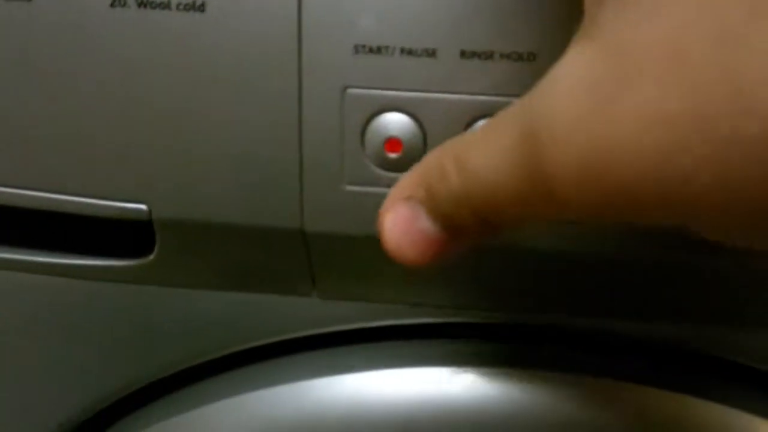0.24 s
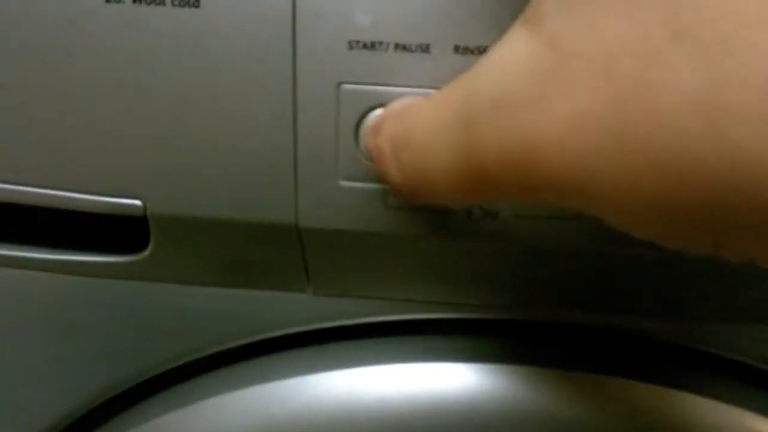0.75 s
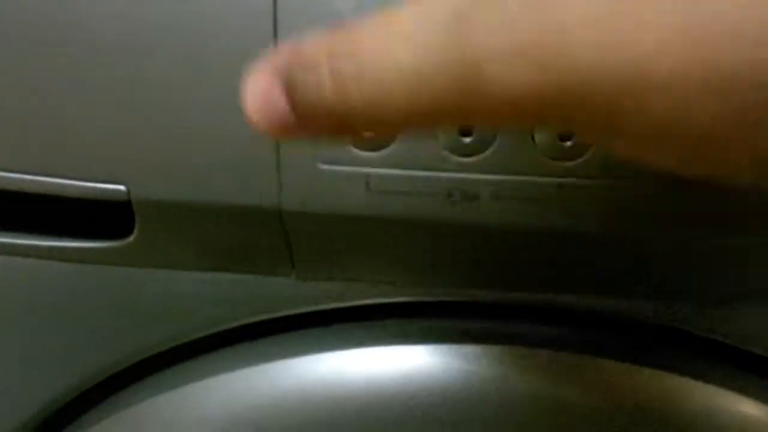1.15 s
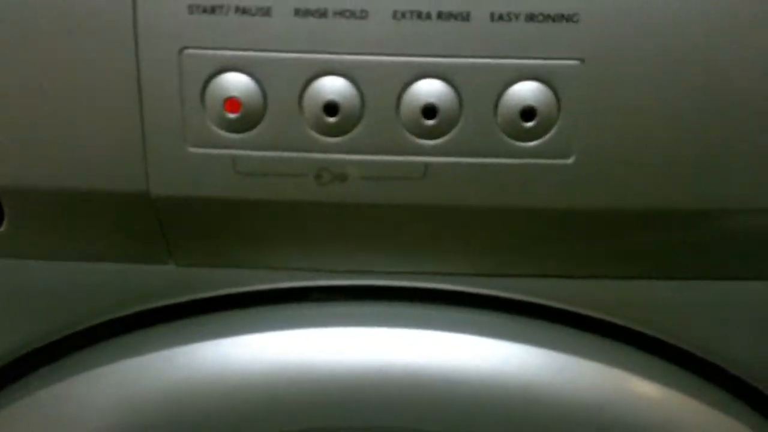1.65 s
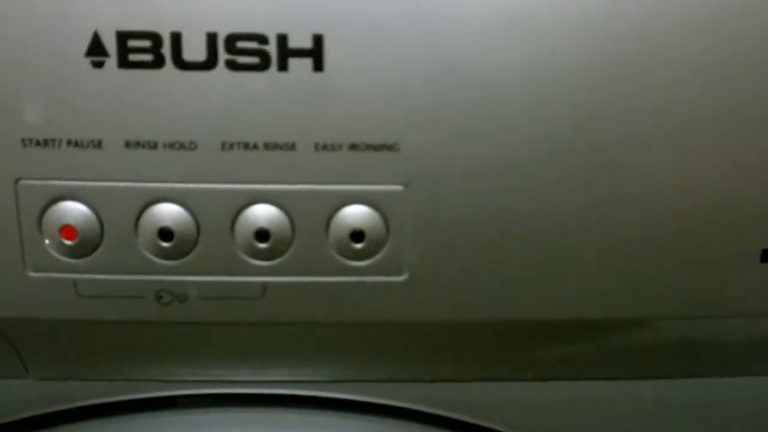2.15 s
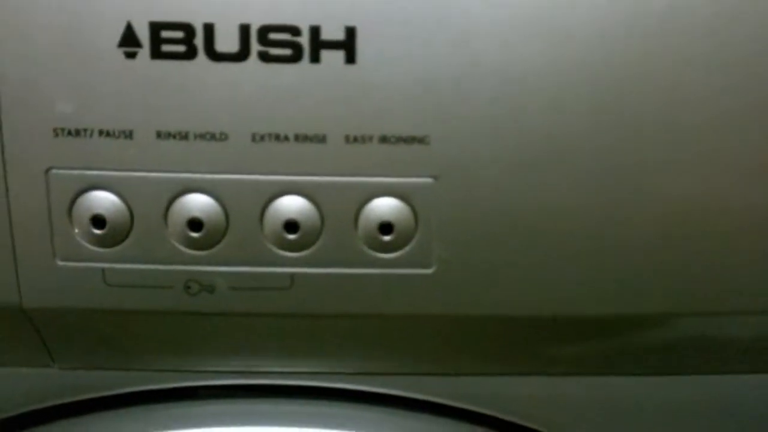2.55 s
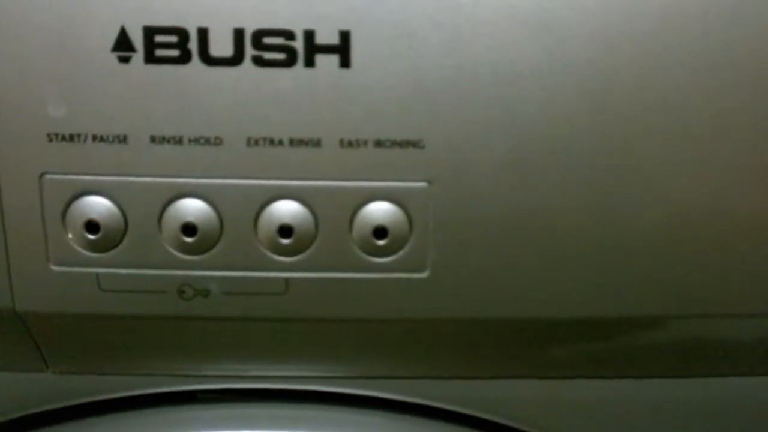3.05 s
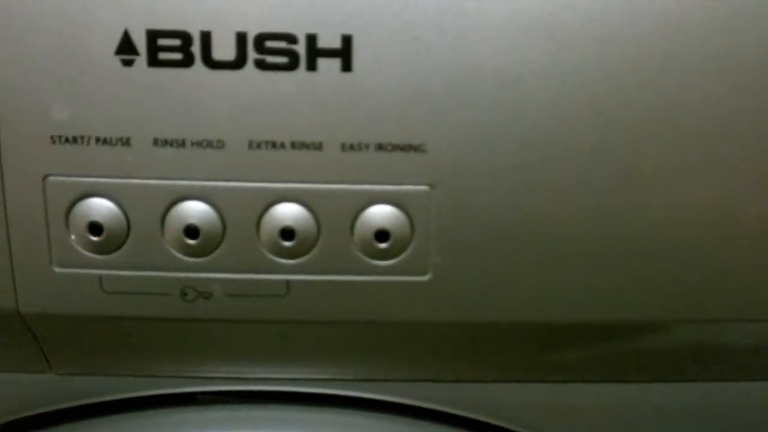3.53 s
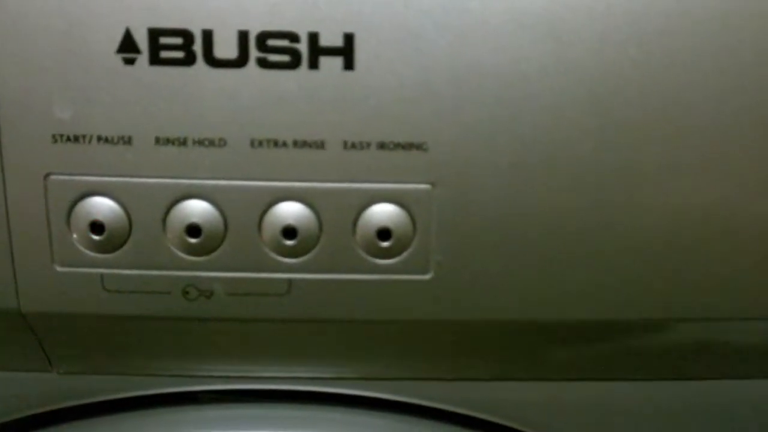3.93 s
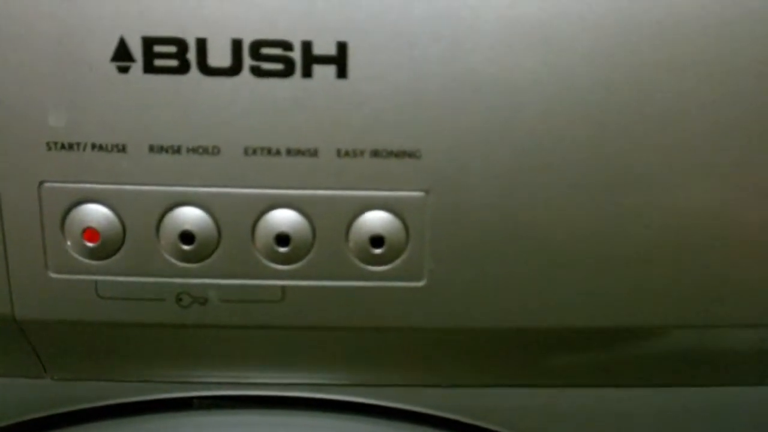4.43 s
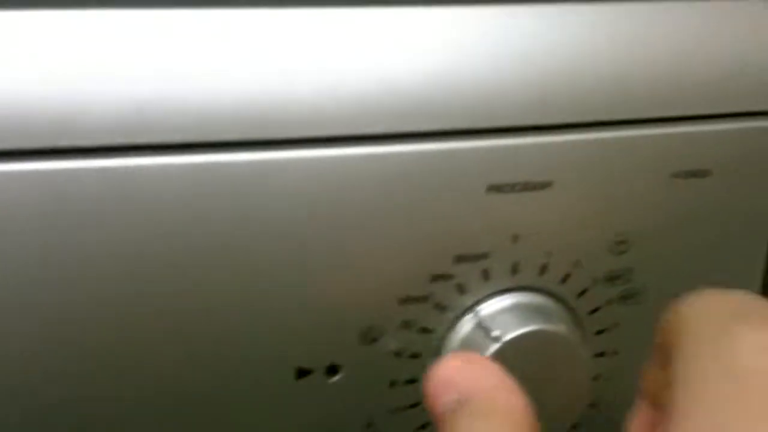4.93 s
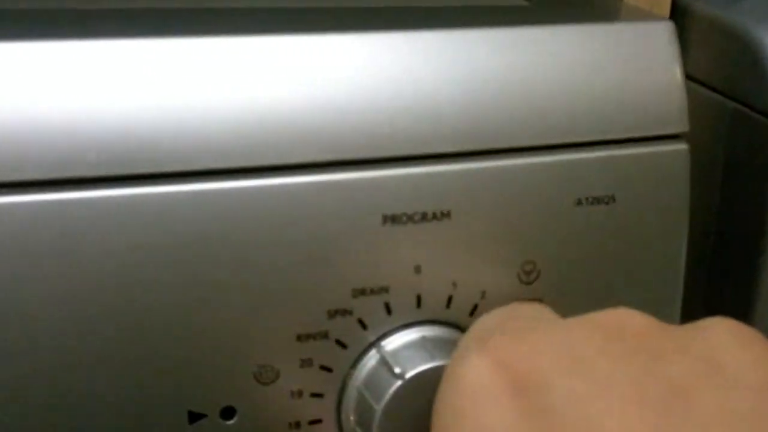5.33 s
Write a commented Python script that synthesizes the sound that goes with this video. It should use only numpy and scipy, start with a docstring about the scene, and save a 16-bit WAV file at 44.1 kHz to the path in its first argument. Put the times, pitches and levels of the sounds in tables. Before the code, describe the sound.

Heard from close by in a home, a washing machine drum whirls at the end of its spin. Loose parts knock so quickly that they merge into a throbbing metallic rumble, under a faint high whine and a steady rush. The tones then slide gently downward, swelling and fading as the drum starts slowing. There is one sharp click, later a dull thump, and finally several quick clunks while the spinning carries on.

```python
"""A front-loading washing machine's drum at the end of its spin, heard close to the control panel.
The unbalanced drum turns 20 times a second and rocks the cabinet: loose parts knock on every swing,
panels boom, and the tub thumps and now and then clunks. The motor whines and its belt buzzes, beating
against the drum's tones. After 1.76 s it coasts, and the tones sink through the cabinet's resonances
(the pitches it rings at). Air and bearings rush; the loudest knocks overload the recorder and click."""
import sys
import numpy as np
from scipy import signal
from scipy.fft import rfft, irfft, next_fast_len
from scipy.io import wavfile
from scipy.ndimage import uniform_filter1d, map_coordinates

SR = 44100
rng = np.random.default_rng(int(sys.argv[2]) if len(sys.argv) > 2 else 0)


def unload_wav(signal):
    """Save mono or channel-first audio to the path in sys.argv[1] as 16-bit WAV at rate SR, clipped to [-1, 1]."""
    wavfile.write(
        sys.argv[1],
        SR,
        np.round(np.clip(np.atleast_2d(signal).T, -1, 1) * 32767).astype(np.int16),
    )


N = 246071

# loose parts, each hit once a turn: place_in_turn (0-1), strength_db
LOOSE_PARTS = [(.27, 1.5), (.42, -3.5), (.83, 0.5)]
# strength of the drum's tones between the resonances: pitch_hz, level_db
KNOCK_SPECTRUM = [(100, -54.5), (200, -56.5), (300, -39.5), (420, -54.5), (540, -56.5), (700, -44.5),
                  (1000, -40.5), (1400, -43.5), (1700, -45.5), (2000, -54), (2600, -61.5), (3500, -69),
                  (4900, -100)]
# cabinet resonances, driven by odd and even multiples of the drum speed:
# pitch_hz, width_hz, rocking_odd_db, rocking_even_db, bouncing_odd_db, bouncing_even_db
CABINET_RESONANCES = [(138.0, 8.0, -30.5, -21.5, -29.5, -29.5), (170.0, 25.0, -29.5, -39.5, -29.0, -55.0),
                      (201.5, 11.0, -27.0, -33.5, -28.5, -35.5), (235.0, 63.0, -32.0, -39.0, -33.0, -32.0),
                      (321, 7, -36, -38, -30, -26), (374.5, 19.5, -39.5, -30.5, -35.0, -34.0),
                      (426.5, 72.5, -27.5, -38.5, -32.5, -30.5), (476.5, 28.0, -22.5, -44.0, -38.0, -33.5),
                      (499.5, 11.5, -24.5, -50.5, -42.5, -55.0), (556.0, 45.5, -33.0, -39.5, -40.0, -38.5),
                      (619.5, 58.0, -34.0, -35.0, -35.5, -36.0), (661, 8, -24, -55, -35, -33),
                      (681.5, 37.5, -27.0, -38.5, -39.0, -27.5), (764, 18, -35, -39, -50, -28),
                      (828.0, 49.5, -35.0, -36.5, -37.5, -35.0), (886.0, 39.5, -36.5, -34.5, -33.5, -36.5),
                      (960.0, 44.0, -40.0, -36.0, -39.5, -34.5), (1038.5, 36.0, -33.5, -37.0, -40.0, -35.5),
                      (1103, 9, -38, -45, -55, -55), (1199.0, 90.0, -40.0, -36.5, -36.0, -40.5),
                      (1308.5, 17.5, -30.0, -32.5, -36.0, -40.0),
                      (1361.5, 27.0, -35.5, -34.5, -32.5, -35.5),
                      (1468.0, 31.0, -55.0, -46.0, -42.0, -47.0),
                      (1543.0, 62.5, -50.0, -44.5, -50.0, -55.0), (1721.5, 8.0, -45.5, -37.0, -38.5, -44.5)]
# how the level changes over time: time_s, drone_and_rush_db, hum_db
LEVEL_CURVES = [(0, 0, 5), (.5, 0.5, 1.5), (1.05, 1, -2.5), (1.5, 1.5, 2.5), (2.45, 1.5, 4.5),
                (2.75, -.5, 5), (3.6, 1, -4), (4.3, 1.5, 1), (4.7, -1, 0), (5.05, 1, 0), (5.58, 0, -8)]
# the deepest hum: multiple_of_drum_speed, level_db, share_of_hum_curve (0-1)
HUM_TONES = [(3, -46, 0.05), (4, -55, .8), (5, -41.5, 0.86)]
# the three large panels: pitch_hz, width_hz
PANEL_RESONANCES = [(228, 81), (376, 16), (480, 120)]
# how loudly they boom: time_s, low_panel_db, middle_panel_db, high_panel_db
PANEL_LEVELS = [(0, -37.5, -32, -26.5), (1.5, -32, -28.5, -28.5), (2.3, -21.5, -29.5, -32),
                (2.9, -36, -29.5, -28.5), (4.1, -34, -24.5, -43), (4.9, -31.5, -39, -41),
                (5.58, -46, -37, -44)]
# the tub hits bottom: start_s, level_db
TUB_HITS = [(0.145, -20), (3.161, -20), (3.319, -12), (4.577, -19), (4.632, -15), (4.684, -10.5),
            (4.743, -10.5), (4.794, -15)]
# tone colour of those hits: pitch_hz, relative_db
CLUNK_SPECTRUM = [(80, -32), (200, -7.5), (390, 6), (520, -3), (850, -2), (1500, -12), (2200, -31),
                  (4000, -28.5), (5000, -63), (12000, -97)]
# motor shaft tones: multiple_of_motor_speed, loaded_db, coasting_db
SHAFT_TONES = [(1, -35, -39), (2, -33, -44), (3, -42, -40), (4, -37, -43), (5, -39, -45)]
# resonances that the shaft tones sink through: pitch_hz, width_hz, peak_db
SHAFT_RESONANCES = [(229, 12, -28.5), (241, 8, -31), (485, 18, -32), (685, 32, -28), (893, 26, -36),
                    (957, 40, -35), (1178, 80, -34)]
# whine of the motor's slots and commutator (its turning contacts):
# multiple_of_motor_speed, loaded_db, coasting_db, flutter_hz
WHINE_TONES = [(16, -59.5, -69.5, 3), (18, -56.5, -54, 6.9), (36, -63.5, -65.5, 22), (54, -85, -93.5, 15)]
# motor housing resonances that lift the whine: pitch_hz, width_hz, lift_db
HOUSING_RESONANCES = [(4290, 94, 2.5), (8150, 52, 6), (7940, 100, 10.5)]
# motor mount resonances, shaken by lumps in the belt: pitch_hz, width_hz, peak_db
MOUNT_RESONANCES = [(350, 16, -35), (375, 30, -26.5), (555, 30, -38), (650, 16, -32), (686, 32, -29),
                    (712, 18, -33.5), (790, 70, -34), (858, 30, -35), (886, 22, -35)]
# tone colour of air and bearings, also used for the tub's thump: pitch_hz, relative_db
RUSH_SPECTRUM = [(25, -38), (80, -24.5), (150, -12), (220, -3.5), (350, -2), (500, -2.5), (820, -0.5),
                 (1000, -1), (1400, -3), (2000, -7.5), (3200, -14.5), (4300, -24.5), (4750, -35.5),
                 (7400, -42.5), (10500, -50.5), (13000, -69)]
# clicks as the loudest knocks overload the recorder, and faint rattles: time_s, click_db, rattle_db
CLICKS_AND_RATTLES = [(1.916, -30, -42), (1.983, -46, -42), (2.045, -44, -41), (2.4185, -12.5, -48),
                      (2.483, -46, -41)]
# ringing of the sheet metal: pitch_hz, width_hz, lift_db
SHEET_RESONANCES = [(685, 50, 5), (810, 50, 2), (885, 40, 2), (1040, 40, 2), (1195, 60, 2), (1305, 22, 4),
                    (1360, 35, 5), (1722, 35, 4)]
# dips in the recorder's treble response, applied to all but the clicks and rattles: pitch_hz, width_hz
RECORDER_DIPS = [(4780, 410), (5870, 910), (8600, 1540), (12000, 1900)]

TIME_S = np.arange(N) / SR
SPIN_HZ, POWER_OFF_S, SLOWING_HZ_PER_S = 20.022, 1.76, .582


def drum_speed(time_s):
    """Turns per second: steady until the power is cut, then friction slows the drum evenly."""
    return SPIN_HZ - SLOWING_HZ_PER_S * np.maximum(time_s - POWER_OFF_S, 0)


def drum_drone(drum_turns, unevenness=.11, waver_db=1.84, bounce_at_s=3.28, bounce_fade_s=.22):
    """Knocks repeat every turn and merge into a stack of tones; each swells as it passes a resonance."""
    start_s = turn_times(drum_turns)
    multiple = np.arange(180)
    hz = np.maximum(multiple * drum_speed(start_s), 1)
    odd = multiple % 2
    # as the drum slows, the cabinet goes from rocking to bouncing
    bouncing = np.clip(.5 + (start_s - bounce_at_s) / bounce_fade_s, 0, 1)
    power = spectrum_gain(hz, KNOCK_SPECTRUM) ** 2
    for centre_hz, width_hz, rock_odd, rock_even, bounce_odd, bounce_even in CABINET_RESONANCES:
        rock_db = np.where(odd, rock_odd, rock_even)
        bounce_db = np.where(odd, bounce_odd, bounce_even)
        db = (1 - bouncing) * rock_db + bouncing * bounce_db
        power += (from_db(db) * bell(hz, centre_hz, width_hz)) ** 2
    power *= hz > KNOCK_SPECTRUM[0][0]  # no tones below the table's lowest pitch
    knocks = loose_part_knocks(hz, multiple)
    knocks /= np.abs(knocks) ** (1 - unevenness)
    waver = unit_level(uniform_filter1d(rng.standard_normal(hz.shape), size=6, axis=0))
    return play_turns(drum_turns, np.sqrt(power) * from_db(waver_db * waver) * knocks)


def loose_part_knocks(hz, multiple, ring_s=.17):
    """What the knocks add to each drum tone: every loose part rings briefly from its place in the turn."""
    age_s = np.arange(SR // 5) / SR
    fade = from_db(-60 * age_s / ring_s)
    tones = 0
    for place, db in LOOSE_PARTS:
        ringing = rfft(rng.standard_normal(len(age_s)) * fade, SR)  # one value per Hz
        delay = np.exp(-2j * np.pi * multiple * place)
        tones += from_db(db) * ringing[np.round(hz).astype(int)] * delay
    return tones / np.sqrt(np.mean(np.abs(tones) ** 2))


def deep_hum(drum_turns, curve_db):
    """The whole machine hums at low multiples of the drum speed."""
    return sum(tone(multiple * drum_turns, db + share * curve_db, waver_db=2, wobble_rad=.21)
               for multiple, db, share in HUM_TONES)


def panel_boom(drum_turns, throb_depth=.55, place_in_turn=.64):
    """Random shaking keeps the large panels booming at their own pitches, with a throb once a turn."""
    boom = 0
    for level_db, (hz, width_hz) in zip(curves(PANEL_LEVELS), PANEL_RESONANCES):
        shaking = rng.standard_normal(N)
        swing = unit_level(resonate(resonate(shaking, hz, width_hz), hz, width_hz))
        power = np.abs(uniform_filter1d(swing ** 2, SR // 16)) + 1e-3
        boom += from_db(level_db) * unit_level(swing / np.sqrt(power))  # friction evens out the swings
    throb = 1 + throb_depth * np.cos(2 * np.pi * (drum_turns - place_in_turn))
    return unit_level(throb) * boom


def tub_thump(drum_turns, load, place_in_turn=.28, fade_db_per_turn=32.5):
    """Once a turn the tub meets its dampers: a sudden clatter that dies before the next."""
    burst = from_db(-fade_db_per_turn * ((drum_turns - place_in_turn) % 1))
    level_db = db_at_load(load, loaded_db=-33, coasting_db=-32.5)
    return from_db(level_db) * sheet_metal(burst * rng.standard_normal(N), RUSH_SPECTRUM)


def tub_clunks(decay_s=.013):
    """Now and then the tub hits bottom hard and the cabinet gives a dull clunk."""
    bursts = sum(from_db(db) * (TIME_S >= start_s) * np.exp(-np.abs(TIME_S - start_s) / decay_s)
                 for start_s, db in TUB_HITS)
    level = np.sqrt(np.mean(bursts ** 2))
    return level * sheet_metal(bursts * rng.standard_normal(N), CLUNK_SPECTRUM)


def motor_shaft(motor_hz, motor_turns, load):
    """The turning shaft gives tones that swell as they sink through resonances."""
    shaft = 0
    for multiple, loaded_db, coasting_db in SHAFT_TONES:
        power = from_db(db_at_load(load, loaded_db, coasting_db)) ** 2
        power += resonance_power(multiple * motor_hz, SHAFT_RESONANCES)
        shaft += np.sqrt(power) * tone(multiple * motor_turns, 0, waver_db=-1, wobble_rad=.056)
    return shaft


def motor_whine(motor_hz, motor_turns, drum_turns, load, flutter_depth=.35, pulse_depth=.16):
    """Slots and commutator give a thin whine that fades in and out and pulses as the tub swings."""
    whine = 0
    for multiple, loaded_db, coasting_db, flutter_hz in WHINE_TONES:
        db = db_at_load(load, loaded_db, coasting_db)
        for hz, width_hz, lift_db in HOUSING_RESONANCES:
            db += lift_db * bell(multiple * motor_hz, hz, width_hz)
        flutter = np.abs(1 + flutter_depth * drift(flutter_hz))
        whine += flutter * tone(multiple * motor_turns, db, waver_db=-2, wobble_rad=.22)
    return whine * (1 + pulse_depth * np.cos(2 * np.pi * drum_turns))


def belt_buzz(drum_hz, load, laps_per_turn=.7462, creep=.0009, tone_count=130):
    """Lumps in the belt repeat every lap; their tones fall between the drum's and beat against them."""
    laps = np.cumsum(drum_hz * laps_per_turn * (1 + creep * load)) / SR
    hz = np.arange(tone_count) * laps_per_turn * drum_speed(turn_times(laps))
    power = (from_db(-42) * bell(hz, centre_hz=670, width_hz=1760)) ** 2
    power *= hz > CABINET_RESONANCES[0][0]  # the broad buzz starts above the lowest cabinet resonance
    power += resonance_power(hz, MOUNT_RESONANCES)
    phases = np.exp(2j * np.pi * rng.random(tone_count))
    return play_turns(laps, np.sqrt(power) * phases)


def air_rush(drum_turns, throb_db=-.66, place_in_turn=.12):
    """Air and bearings roar, swelling a little as the drum swings, twice a turn."""
    swell = from_db(throb_db * np.cos(4 * np.pi * (drum_turns - place_in_turn)))
    return sheet_metal(swell * rng.standard_normal(N), RUSH_SPECTRUM)


def overload_clicks(click_s=.0002, knock_s=.0007, knock_db=11, rattle_decay_s=.0033):
    """Sharp pulses imitate the loudest knocks overloading the recorder; a few faint rattles join in."""
    age_s = np.arange(-SR // 100, SR // 10) / SR
    click = pulse(age_s, click_s) + from_db(knock_db) * pulse(age_s, knock_s)
    fade = (age_s > 0) * np.exp(-np.abs(age_s) / rattle_decay_s)
    clicks, rattles = np.zeros(N), np.zeros(N)
    for time_s, click_db, rattle_db in CLICKS_AND_RATTLES:
        span = round((time_s + age_s[0]) * SR) + np.arange(len(age_s))
        clicks[span] += from_db(click_db) * click
        rattles[span] += from_db(rattle_db) * fade * rng.standard_normal(len(age_s))
    click_band = signal.butter(2, [300, 7500], "band", fs=SR, output="sos")
    return signal.sosfilt(click_band, clicks) + resonate(rattles + 1e-18, hz=5200, width_hz=1100)


def sheet_metal(sound, spectrum):
    """The cabinet gives a sound a broad tone colour and rings along with it; comes out at level 1."""
    size = next_fast_len(N)
    bin_hz = np.maximum(np.arange(size // 2 + 1) * SR / size, 1)
    shaped = irfft(rfft(sound, size) * spectrum_gain(bin_hz, spectrum), size)[:N]
    ringing = sum((from_db(lift_db) - 1) * resonate(shaped, hz, width_hz)
                  for hz, width_hz, lift_db in SHEET_RESONANCES)
    return unit_level(shaped + ringing)


def pulse(age_s, length_s):
    """One brief half-sine bump, centred on age zero."""
    return np.cos(np.pi * age_s / length_s) * (np.abs(age_s) < length_s / 2)


def turn_times(turns):
    """The second at which each turn begins, as a column."""
    return np.interp(np.arange(int(turns[-1]) + 2), turns, TIME_S)[:, None]


def play_turns(turns, tones, size=8192):
    """Builds one wave per turn from its row of tones, and blends from each wave into the next."""
    waves = irfft(tones / np.sqrt(2), size) * size
    return map_coordinates(waves, [turns, turns % 1 * size], order=1, mode="grid-wrap")


def tone(cycles, db, waver_db, wobble_rad):
    """A sine that follows a rotation, wavering a little in level and phase."""
    phase = 2 * np.pi * (cycles + rng.random()) + wobble_rad * drift(2.2)
    return np.sqrt(2) * from_db(db + waver_db * drift(1.6)) * np.sin(phase)


def drift(rate_hz):
    """A smooth random wander of about 1 either way, worked out every 100 samples."""
    keep = np.exp(-200 * np.pi * rate_hz / SR)
    noise = rng.standard_normal(N // 100 + 1002)
    slow = signal.lfilter([1], [1, -2 * keep, keep * keep], noise)[1000:]
    return np.interp(np.arange(N) / 100, np.arange(len(slow)), unit_level(slow))


def resonate(sound, hz, width_hz):
    """Lets one pitch through at full strength and weakens the rest."""
    keep = np.exp(-np.pi * width_hz / SR)
    feedback = [1, -2 * keep * np.cos(2 * np.pi * hz / SR), keep * keep]
    return signal.lfilter(np.array([1, 0, -1]) * (1 - keep * keep) / 2, feedback, sound)


def bell(hz, centre_hz, width_hz):
    """The bell-shaped curve of a resonance, 1 on top."""
    return 1 / (1 + (2 * (hz - centre_hz) / width_hz) ** 2)


def resonance_power(hz, resonances):
    """The power that a set of resonances gives a tone at this pitch."""
    return sum((from_db(db) * bell(hz, centre, width)) ** 2 for centre, width, db in resonances)


def spectrum_gain(hz, spectrum):
    """Reads a tone colour table at any pitch, as a gain."""
    pitch_hz, db = np.transpose(spectrum)
    return from_db(np.interp(np.log(hz), np.log(pitch_hz), db))


def curves(rows):
    """Turns a table of times and levels into one curve per level column."""
    time_s, *columns = np.transpose(rows)
    return [np.interp(TIME_S, time_s, column) for column in columns]


def db_at_load(load, loaded_db, coasting_db):
    return coasting_db + load * (loaded_db - coasting_db)


def unit_level(sound):
    return sound / np.sqrt(np.mean(sound ** 2) + 1e-20)


def from_db(db):
    return 10 ** (np.asarray(db) / 20)


def scene(belt_ratio=12.202, belt_slip=.0044, unload_s=.15):
    """Works out the drum's speed and the motor's load, then mixes all the sounds into one channel."""
    drum_hz = drum_speed(TIME_S)
    drum_turns = np.cumsum(drum_hz) / SR
    load = np.clip(.5 - (TIME_S - POWER_OFF_S) / unload_s, 0, 1)  # 1 driving, 0 coasting
    motor_hz = drum_hz * belt_ratio * (1 + belt_slip * load)
    motor_turns = np.cumsum(motor_hz) / SR
    swell_db, hum_db = curves(LEVEL_CURVES)
    mix = from_db(swell_db - .5) * drum_drone(drum_turns)
    mix += deep_hum(drum_turns, hum_db) + panel_boom(drum_turns)
    mix += tub_thump(drum_turns, load) + tub_clunks()
    mix += from_db(swell_db - 24) * air_rush(drum_turns)
    mix += from_db(-3.5) * belt_buzz(drum_hz, load)
    mix += motor_shaft(motor_hz, motor_turns, load)
    mix += motor_whine(motor_hz, motor_turns, drum_turns, load)
    for hz, width_hz in RECORDER_DIPS:
        mix -= resonate(mix, hz, width_hz)
    return (mix + overload_clicks())[None]


def record(dry):
    """Cuts the highest treble, above about 16 kHz."""
    return signal.sosfilt(signal.cheby2(12, 70, 16500, fs=SR, output="sos"), dry)


dry = scene()
out = record(dry)
unload_wav(out)
```